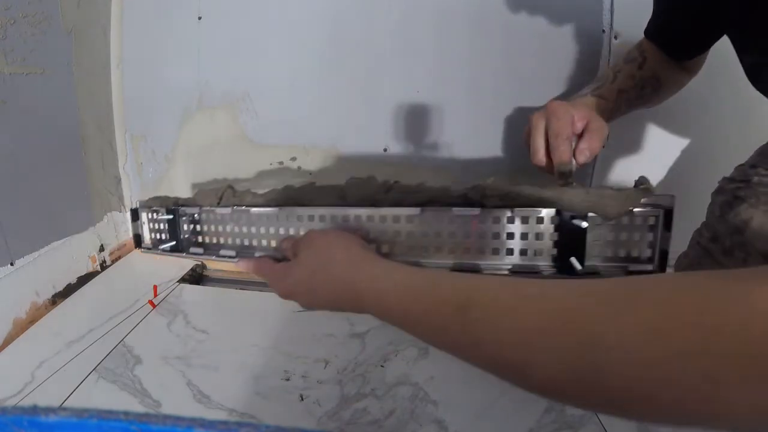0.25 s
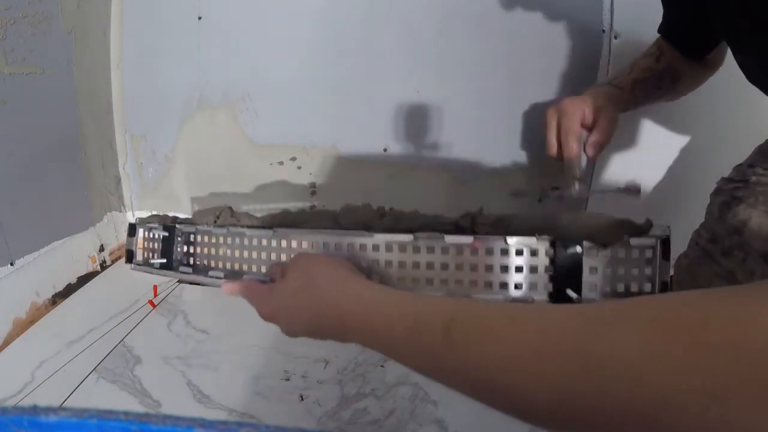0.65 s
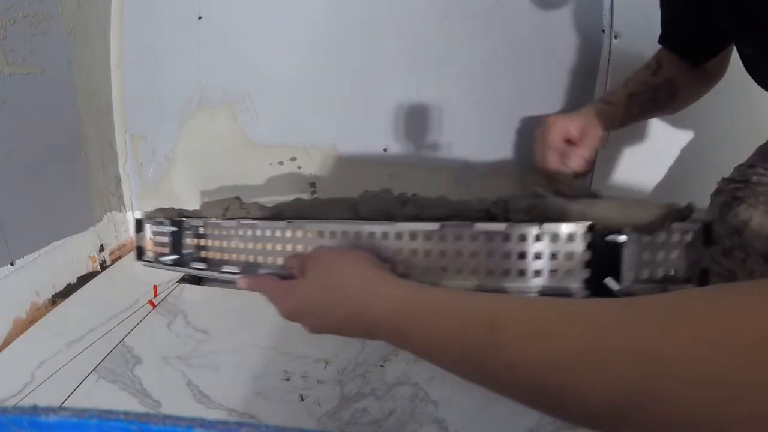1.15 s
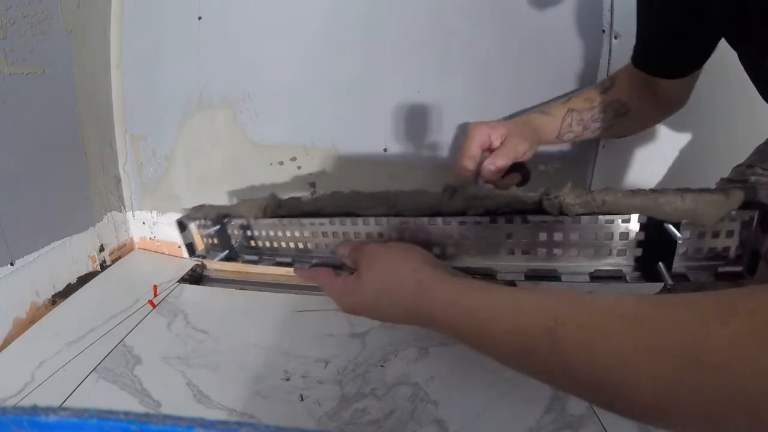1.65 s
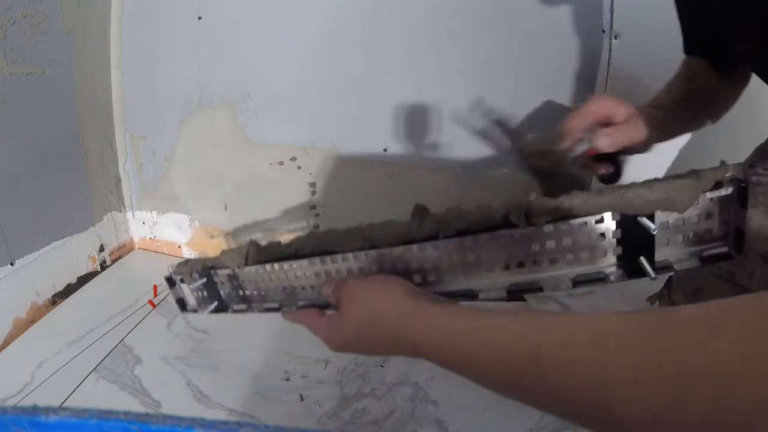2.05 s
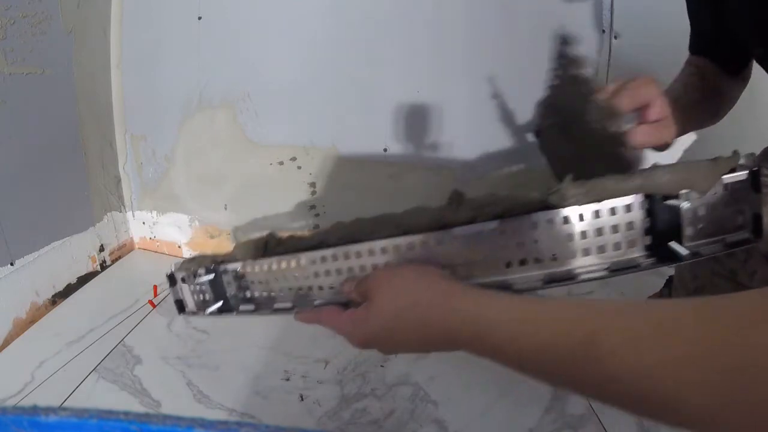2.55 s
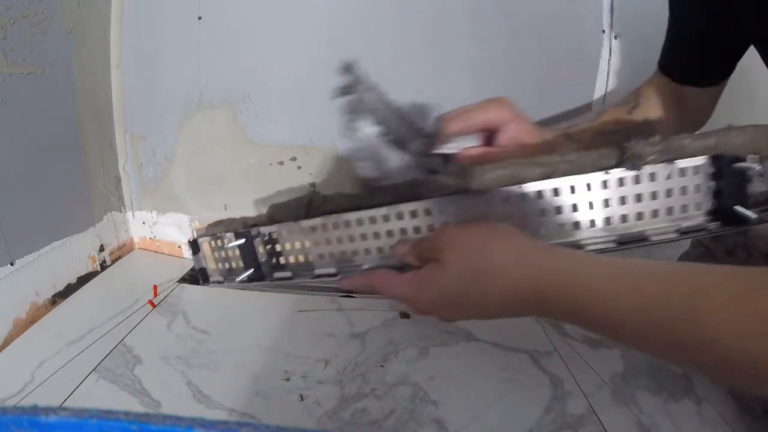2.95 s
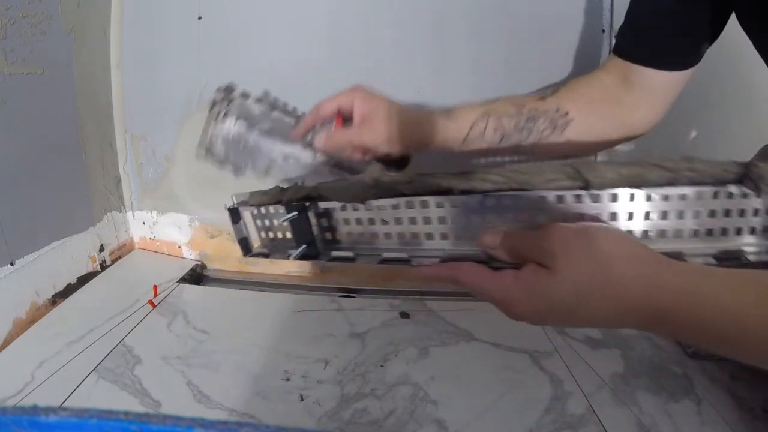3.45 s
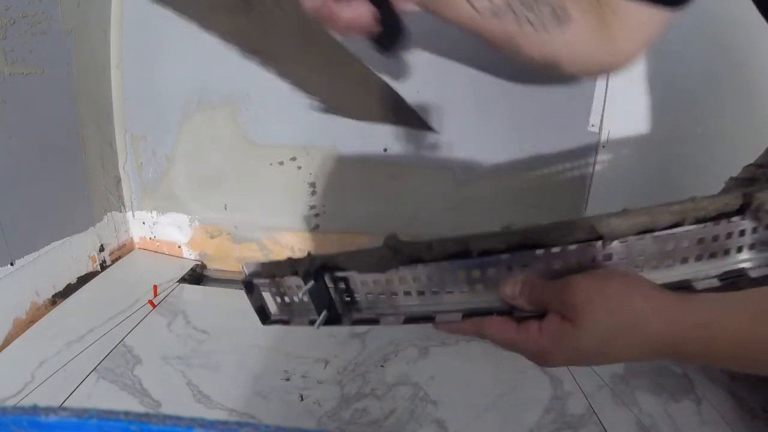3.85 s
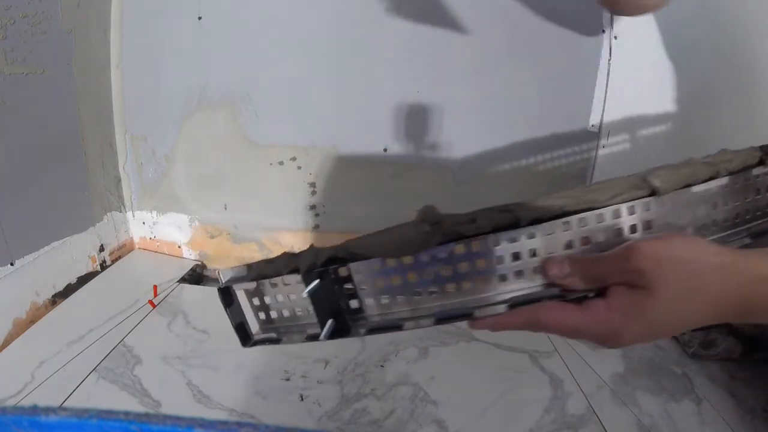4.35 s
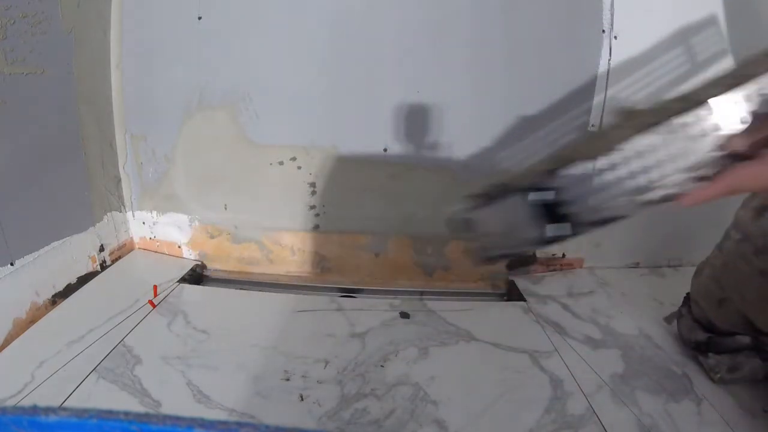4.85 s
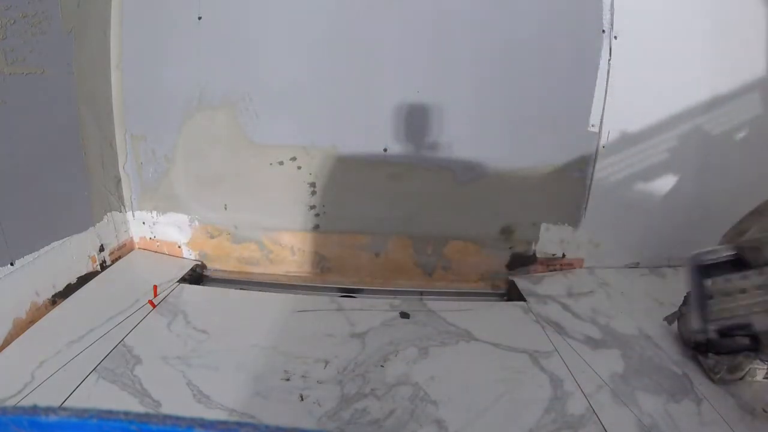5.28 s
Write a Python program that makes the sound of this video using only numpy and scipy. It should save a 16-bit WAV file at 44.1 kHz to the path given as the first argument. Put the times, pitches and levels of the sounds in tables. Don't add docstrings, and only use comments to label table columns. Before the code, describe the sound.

Close, bright metallic scraping: a blade catches on thin perforated steel loaded with mortar, each knock giving a brief damped clank with gritty crackle. Isolated dabs lead to nearly a second of dense scraping. Then it quiets to tiny ticks, grit hissing under a sole and faint rubber chirps, ending with a muffled floor thud. Hard-walled room, live reverberation, small camera microphone, low hum and soft hiss.

```python
import sys
import numpy as np
from scipy import signal
from scipy.fft import rfft, irfft
from scipy.io import wavfile
from scipy.ndimage import uniform_filter1d

SR = 44100
rng = np.random.default_rng(int(sys.argv[2]) if len(sys.argv) > 2 else 0)


def wav_record(signal):
    frames = np.transpose(np.atleast_2d(signal))
    bounded = np.clip(frames, -1, 1)
    quanta = np.round(bounded * 32767).astype(np.int16)
    wavfile.write(sys.argv[1], SR, quanta)


def boost(x):
    u = np.asarray(x, float) / 20
    return 10 ** u


N = 243431
T = np.arange(N) / SR

# (frequency [Hz], level [dB])
AIR_SPECTRUM = [(20, -7.5), (42, -17.5), (60, -4.5), (80, -3.5), (103, -8.5), (160, -17), (400, -21.5),
                (1300, -26.5), (2500, -31.5), (4800, -42), (6000, -38.5), (8000, -31.5), (10000, -41),
                (14000, -39)]
# (frequency [Hz], level [dB])
HUM_TONES = [(27, -68), (59, -60), (102, -63)]
AIR_DB, WHINE_HZ, WHINE_DB = -56.5, 714, -71

# (frequency [Hz], t60 [s], level [dB])
ROOM_DECAY = [(100, 0.49, 4.5), (506, 0.39, 2.5), (1020, 0.47, 2), (1400, 0.49, 1.5), (2020, 0.51, 0.5),
              (3740, 0.57, 1), (6100, 0.52, 3.5), (13900, 0.29, 0.5)]
ROOM_DB = -8

# (touch [s], full pressure [s], lift [s], hiss [dB], drumming [dB])
CLOTH_RUSTLE = (4, 4, 6, -63.5, -60.5)
# (touch [s], lift [s], hiss [dB], floor
# drumming [dB], weight [dB])
SOLE_DRAGS = [
    (3.733, 3.84, -56.5, -54.5, -17.5),
    (4.198, 4.287, -67, -95, -16),
    (4.475, 4.504, -42, -70, -11),
    (4.502, 4.63, -30, -39, -35),
    (4.834, 4.931, -38.5, -47.5, -12.5),
    (5.01, 5.117, -52, -67, 3),
    (5.127, 5.152, -41, -42, -7),
    (5.165, 5.177, -43, -34.5, 6),
]
# (frequency [Hz], level [dB])
SOLE_SPECTRUM = [(700, -12), (1500, -3), (2200, 1), (2900, 0), (3700, 2), (5200, -7), (7500, -12.5),
                 (10000, -20), (11200, -19), (12500, -38), (14000, -72)]
# (frequency [Hz], level [dB])
HEAVY_SPECTRUM = [(400, -20.0), (800, 0.5), (1200, -8.0), (1700, -4.0), (3000, -15.0), (9000, -44)]
DRUM_SPECTRUM = [(100, -35), (200, 0), (350, 6.5), (600, 3.0), (1200, -25), (5000, -59)]
# (start [s], length [s], pitch [Hz], level [dB])
SOLE_SQUEAKS = [
    (3.98, 0.069, 4120, -67.5),
    (4.069, 0.0081, 3650, -57),
    (4.09, 0.11, 3620, -75),
    (4.195, .1, 4100, -72),
    (4.317, 0.053, 3600, -82),
]

# (time [s], level [dB], push length [ms], note [Hz], note level [dB])
SOFT_THUDS = [
    (1.595, -67, 3.5, 208, -44.5),
    (2.459, -42.5, 0.51, 345, -34.5),
    (5.134, -40.5, 6.4, 85.4, -46),
    (5.174, -29.5, 2.35, 100, -34.5),
    (5.183, -39, 4.3, 214, -27.5),
    (5.205, -39.5, 3, 392, -34.5),
    (5.217, -60, 4, 80.5, -31.5),
    (5.258, -43.5, 8.4, 133, -43),
]
# (frequency [Hz], level [dB])
SLAB_SPECTRUM = [(40, 7), (90, 8), (210, 1), (290, -25), (380, 14), (600, -14), (1000, 7.5), (2500, -41)]

# (time [s], peak [dB], pitch [Hz], length [ms])
MORTAR_CRUMBS = [
    (4.1574, -32, 3500, 2.1),
    (4.1894, -51, 3560, 3.0),
    (4.2248, -47, 4100, 4),
    (4.3111, -35, 3260, 1.5),
    (4.351, -45, 2440, 3.0),
    (4.4164, -56, 3960, 3.0),
    (4.4787, -30, 3650, 1.8),
    (5.1332, -35.5, 2970, 5.2),
    (5.1726, -25, 2200, 2.8),
]
# (frequency [Hz], level [dB])
CRUMB_SPECTRUM = [(900, -22), (1900, 8.0), (3500, 7.5), (5500, -0.5), (7000, -15), (9000, -7), (13000, -41)]

# (frequency [Hz], level [dB])
CHANNEL_MODES = [(1175, -20), (1225, -26), (1365, -27)]
CHANNEL_HZ, CHANNEL_WIDTH_HZ, CHANNEL_T60_S, CHANNEL_DB = 1296, 374, 0.57, -13.5
# (frequency [Hz], level [dB], t60 [s])
STEEL_MODES = [(713, -14.5, 0.11), (857, 2.5, 0.018), (998, 2, 0.029), (1153, -2.5, 0.08), (1232, -4, 0.12),
               (1370, 2.5, 0.075), (1550, -2.5, 0.048), (1703, 0.5, 0.025), (2026, -5, 0.11),
               (2280, 2, 0.029), (3320, 10, 0.017), (3430, -9, 0.02), (3790, 0.5, 0.025),
               (4790, -2.5, 0.012)]
MORTAR_T60_S = 0.1
# (frequency [Hz], level [dB])
BLADE_SPECTRUM = [(150, -43), (400, -11.5), (800, -5.5), (1400, 3), (2700, -3.5), (3600, -1), (5300, -11.5),
                  (8000, -18), (10000, -26), (11300, -19.5), (12500, -33), (14000, -51)]

# (touch [s], full pressure [s], lift [s], grit level [dB], brightness [dB])
TROWEL_STROKES = [(0, -0.013, 0.071, -45.5, -1), (0.319, 0.417, 0.46, -33.5, -3),
                  (0.483, 0.49, 0.61, -37, 0.5), (1.052, 1.061, 1.093, -33, -7.5),
                  (1.652, 1.678, 1.67, -28, -8), (1.695, 1.716, 1.711, -33, -0.5),
                  (2.456, 2.468, 2.76, -38.5, 1.5), (2.64, 2.68, 2.81, -35.5, -2.5),
                  (2.81, 2.83, 2.94, -38, -2.5), (2.956, 2.965, 2.99, -33, -5.5),
                  (3.065, 3.068, 3.087, -33, -1.5), (3.085, 3.12, 3.266, -40, -1.5),
                  (3.275, 3.314, 3.405, -36.5, -3)]
# (time [s], peak [dB], brightness [dB], note
# [Hz])
BLADE_CATCHES = [(0.059, -45, -5, 1200), (.09, -32.5, -4, 3110), (.325, -36.5, -8, 1040),
                 (.353, -27, -12, 3080), (0.397, -24, -2.5, 1370), (.437, -20.5, -2, 2000),
                 (.461, -17.5, -2.5, 1517), (0.498, -20.5, 1.5, 1800), (.549, -25, -7, 1660),
                 (.589, -27, 2, 1450), (.535, -26, 5, 1400), (.566, -19.5, 4, 1910),
                 (1.063, -22.5, -0.5, 3240), (1.08, -17.5, -8, 1424), (1.091, -25, -2, 1330),
                 (1.118, -21, -2, 1190), (1.667, -24, 1.5, 3380), (1.673, -17.5, -3.5, 1170),
                 (1.679, -19.5, -6, 2280), (1.693, -16, -2.5, 1400), (1.714, -23.5, 1.5, 1760),
                 (1.726, -22, 5, 1070), (1.737, -21, 1, 1314),
                 (2.459, -13, 0, 2280), (2.535, -19, -4.5, 1370), (2.567, -19, -3, 1380),
                  (2.596, -29, -8, 1380), (2.657, -29, -2, 1500), (2.669, -15, -3, 1514),
                  (2.687, -24, -1, 1550), (2.76, -19.5, -4.5, 840), (2.78, -23, -18, 1370),
                  (2.946, -13, -3, 2280), (2.989, -20, -24, 1135), (3.073, -16.5, -2.5, 1210),
                  (3.088, -26, 0, 1106), (3.11, -32, 3, 2270), (3.119, -16.5, 2.5, 2310),
                  (3.147, -16, -16, 1046), (3.188, -17.5, 1, 1115), (3.225, -19, -4.5, 787),
                  (3.254, -24, -3, 1133), (3.332, -26, -5, 785), (3.383, -18.5, -1, 1605),
                  (3.397, -23.5, -5, 1400)]
ATTACK_CURVE = 0.76
BLADE_LIFT_DB_S, SOLE_LIFT_DB_S = 154, 146
CONTACT_MS, NOTE_DB = 3.62, -5
DULL_LONGER = 0.15

PORT_HZ, PORT_WIDTH_HZ, PORT_GAIN, TOP_HZ = 6444, 300, 3.68, 13100


def level(x, db):
    return x * boost(db) / np.sqrt(np.mean(x ** 2))


def unit_energy(response):
    return response / np.sqrt(np.sum(response ** 2))


def colour(x, points, size=4096):
    hz, db = np.transpose(points)
    gain = boost(np.interp(np.log(np.fft.rfftfreq(size, 1 / SR) + 1), np.log(hz), db))
    cepstrum = irfft(np.log(gain))
    cepstrum[1:size // 2] *= 2
    cepstrum[size // 2 + 1:] = 0
    response = irfft(np.exp(rfft(cepstrum)))
    return signal.fftconvolve(x, unit_energy(response))[:len(x)]


def split(x, kind, hz):
    return signal.sosfilt(signal.butter(2, hz, kind, fs=SR, output="sos"), x)


def flicker(rate_hz):
    hold = int(SR / rate_hz)
    steps = np.repeat(rng.standard_normal(N // hold + 1), hold)
    return 1.273 * uniform_filter1d(steps, hold)[:N]


def grit(per_s, scatter_db):
    chance = rng.random((3, N))
    snaps = chance[0] < per_s / SR
    sign = np.sign(chance[1] - 0.5)
    size = boost(-scatter_db * np.log(1 - chance[2]))
    return level(snaps * sign * size, 0)


def press(touch, full, lift, lift_db_s):
    rise = np.clip((T - touch) / max(full - touch, 0.002), 0, 1) ** ATTACK_CURVE
    return rise * boost(-lift_db_s * np.maximum(T - lift, 0))


def add(into, s, x):
    start = int(s * SR)
    into[start:start + len(x)] += x[:N - start]


def building():
    air = level(colour(rng.standard_normal(N), AIR_SPECTRUM), AIR_DB)
    whine = boost(WHINE_DB + 2.0 * flicker(8.6)) * np.sin(2 * np.pi * WHINE_HZ * T)
    hum = np.zeros(N)
    for hz, db in HUM_TONES:
        phase = 2 * np.pi * hz / SR * np.cumsum(1 + 0.0601 * flicker(14))
        hum += boost(db + 2.2 * flicker(15)) * np.sin(phase)
    return air + whine + 2 ** 0.5 * hum


def room(x):
    t, wet = np.arange(int(0.8 * SR)) / SR, np.zeros(N)
    place = np.pi / 2 * flicker(7)
    corners_hz, t60s, dbs = np.transpose(ROOM_DECAY)
    for share in (np.cos(place), np.sin(place)):
        noise = rng.standard_normal(len(t)) * np.clip(t / 0.0015 - 0.5, 0, 1)
        tail = np.zeros(len(t))
        for hz in 62.5 * 2 ** np.arange(0, 8, 0.5):
            edges_hz = [hz / 2 ** 0.25, hz * 2 ** 0.25]
            band = split(noise, "band", edges_hz)
            decay = 1000. ** (-t / np.interp(hz, corners_hz, t60s))
            tail += band * boost(np.interp(hz, corners_hz, dbs)) * decay
        wet += signal.fftconvolve(share * x, unit_energy(tail))[:N]
    return x + boost(ROOM_DB) * wet


def scuff():
    sand = grit(12000, 0.59) * boost(flicker(80))
    coarse = grit(1500, 0.85)
    touch, full, lift, hiss_db, drum_db = CLOTH_RUSTLE
    cloth = press(touch, full, lift, SOLE_LIFT_DB_S)
    hiss, drum, heavy = cloth * boost(hiss_db - 3.5), cloth * boost(drum_db - 4.0), np.zeros(N)
    for touch, lift, hiss_db, drum_db, weight_db in SOLE_DRAGS:
        full = touch + 0.78 * (lift - touch)
        drag = press(touch, full, lift, SOLE_LIFT_DB_S)
        hiss += drag * boost(hiss_db - 4.0)
        drum += drag * boost(drum_db - 7.5)
        heavy += drag * boost(hiss_db + weight_db - 9.5)
    fine = colour(sand * hiss, SOLE_SPECTRUM)
    dull = colour(sand * heavy, HEAVY_SPECTRUM)
    return fine + dull + colour(coarse * drum, DRUM_SPECTRUM)


def squeaks():
    out = np.zeros(N)
    waver, flutter = 1 + 0.0123 * flicker(46), boost(3 * flicker(90))
    for s, length_s, hz, db in SOLE_SQUEAKS:
        swell = np.sin(np.pi * np.clip((T - s) / length_s, 0, 1))
        whistle = np.sin(2 * np.pi * hz / SR * np.cumsum(waver))
        out += boost(db) * swell * flutter * whistle
    return out


def thuds():
    force, notes, t = np.zeros(N), np.zeros(N), np.arange(8000) / SR
    for s, db, ms, hz, note_db in SOFT_THUDS:
        add(force, s, boost(db) * np.hanning(int(ms * SR / 1000) + 3))
        add(notes, s, boost(note_db) * np.sin(2 * np.pi * hz * t) * np.exp(-t / 0.015))
    return colour(split(force, "high", 48), SLAB_SPECTRUM) + notes


def crumbs():
    out, t = np.zeros(N), np.arange(1000) / SR
    for s, db, hz, ms in MORTAR_CRUMBS:
        crack = rng.standard_normal(len(t))
        ring = boost(-10.5) * np.sin(2 * np.pi * hz * t)
        add(out, s, boost(db) * (ring + crack) * np.exp(-1000 * t / ms))
    return boost(-5.5) * colour(out, CRUMB_SPECTRUM)


def channel(force):
    t = np.arange(int(0.8 * SR)) / SR
    edges_hz = CHANNEL_HZ + CHANNEL_WIDTH_HZ / 2 * np.array([-1, 1])
    band = signal.butter(3, edges_hz, "band", fs=SR, output="sos")
    cluster = signal.sosfilt(band, rng.standard_normal(len(t)))
    cluster += sum(boost(db) * np.sin(2 * np.pi * hz * t) for hz, db in CHANNEL_MODES)
    cluster *= 1000. ** (-t / CHANNEL_T60_S)
    return boost(CHANNEL_DB) * signal.fftconvolve(force, unit_energy(cluster))[:N]


def steel(force):
    t = np.arange(SR // 2) / SR
    out = boost(-2.5) * colour(force, BLADE_SPECTRUM)
    place = np.pi / 2 * flicker(5)
    for share in (np.cos(place), np.sin(place)):
        ring = np.zeros(len(t))
        for hz, db, t60 in STEEL_MODES:
            level_luck, pitch_luck = rng.standard_normal(2)
            tone = np.sin(2 * np.pi * hz * (1 + pitch_luck / 200) * t)
            ring += boost(db + 2 * level_luck) * tone * 1000. ** (-t / min(t60, MORTAR_T60_S))
        out += boost(-5.0) * signal.fftconvolve(share * force, unit_energy(ring))[:N]
    return out


def trowel():
    sand = grit(4000, 2.5) * boost(1.8 * flicker(60))
    dull, bright, notes = np.zeros(N), np.zeros(N), np.zeros(N)
    for touch, full, lift, db, bright_db in TROWEL_STROKES:
        drag = sand * boost(db - 4) * press(touch, full, lift, BLADE_LIFT_DB_S)
        dull += drag
        bright += boost(bright_db) * drag
    t = np.arange(3000) / SR
    for s, db, bright_db, hz in BLADE_CATCHES:
        ms = CONTACT_MS * boost(-DULL_LONGER * bright_db)
        rise = boost(db - 3) * (1 - np.exp(-3000 * t / ms))
        burst = rise * rng.standard_normal(len(t)) * np.exp(-1000 * t / ms)
        add(dull, s, burst)
        add(bright, s, boost(bright_db) * burst)
        tone = np.sin(2 * np.pi * hz * t) * np.exp(-1000 * t / (1.28 * ms))
        add(notes, s, boost(NOTE_DB) * rise * tone)
    force = split(dull, "low", 2180) + bright - split(bright, "low", 2600)
    ringing = split(steel(force) + channel(force), "high", 280)
    return split(ringing, "high", 240) + notes


def scene():
    sources = scuff() + squeaks() + thuds() + crumbs() + trowel()
    return (building() + room(sources))[None]


def low_pass(x):
    return signal.sosfilt(signal.butter(12, 14970, fs=SR, output="sos"), x)


def record(dry):
    port = signal.lfilter(*signal.iirpeak(PORT_HZ, PORT_HZ / PORT_WIDTH_HZ, fs=SR), dry)
    top_cut = signal.butter(8, TOP_HZ, fs=SR, output="sos")
    heard = signal.sosfilt(top_cut, dry + PORT_GAIN * port)
    return low_pass(heard)


dry = scene()
out = record(dry)
wav_record(out)
```